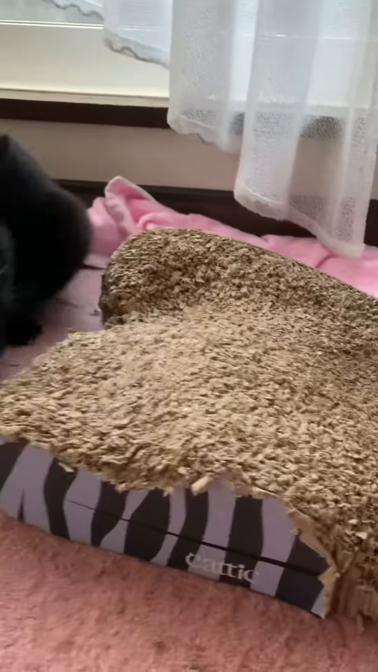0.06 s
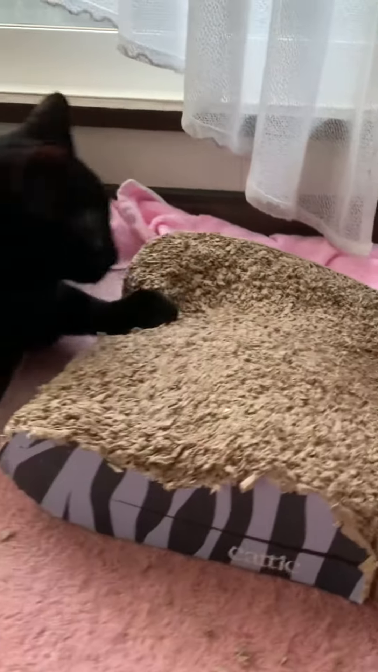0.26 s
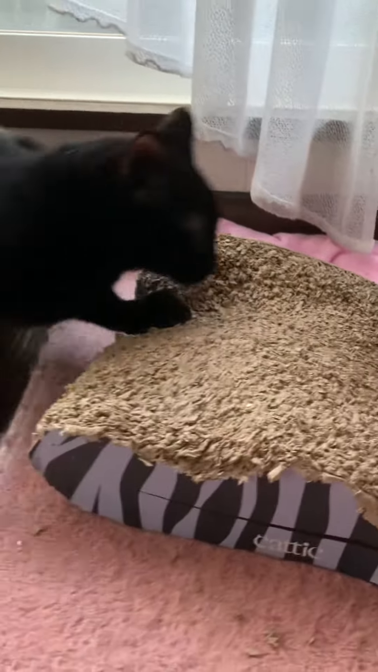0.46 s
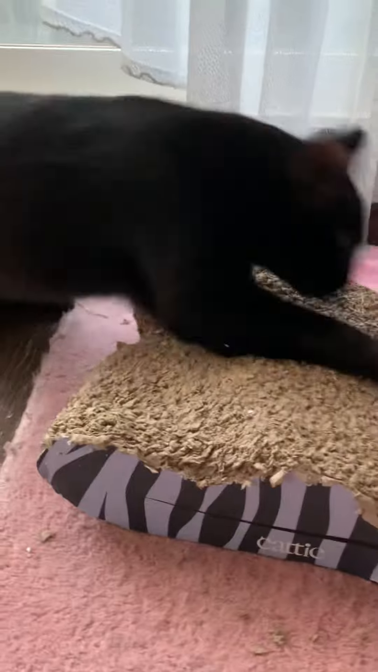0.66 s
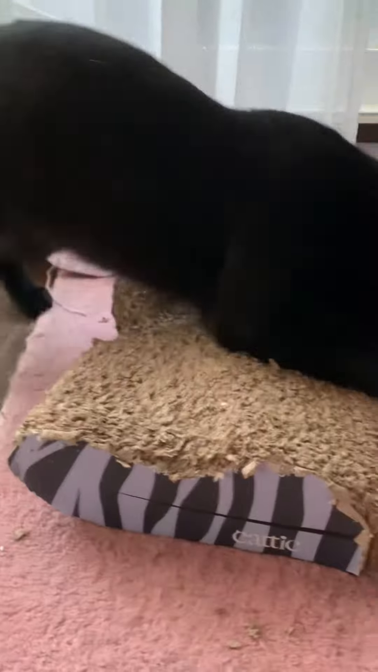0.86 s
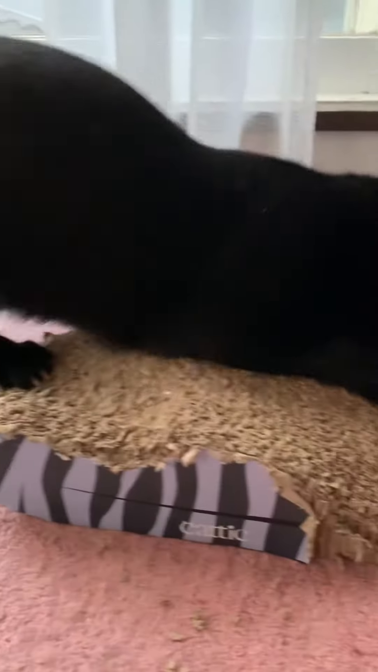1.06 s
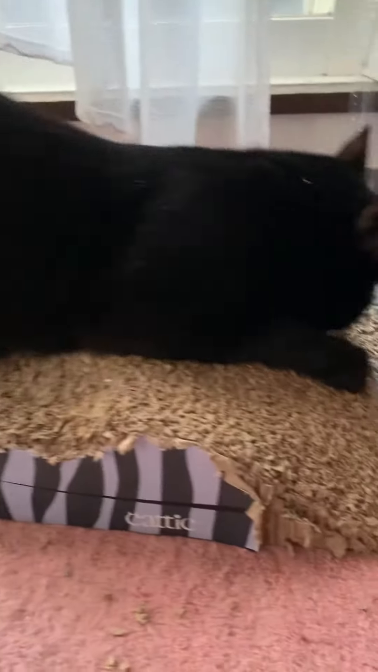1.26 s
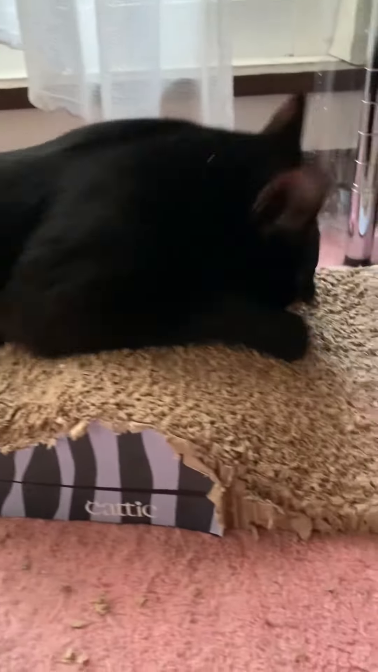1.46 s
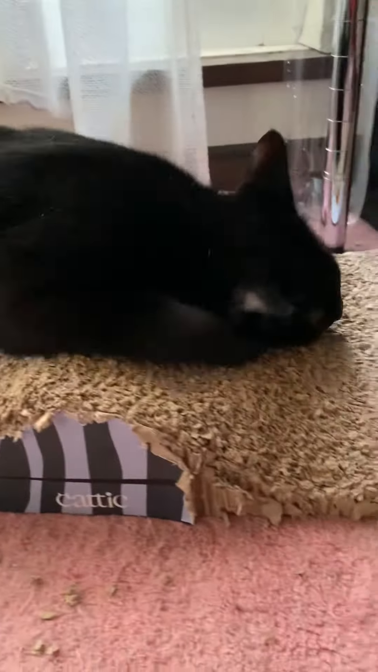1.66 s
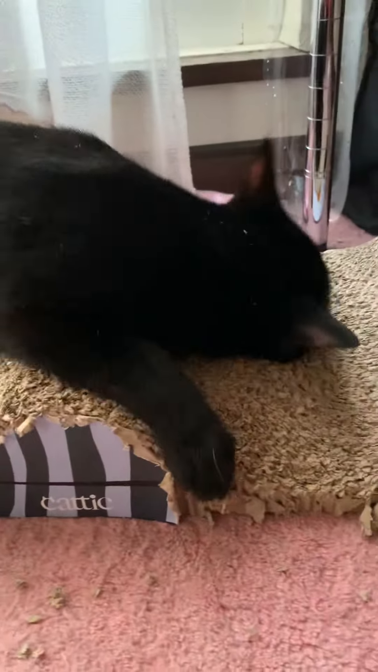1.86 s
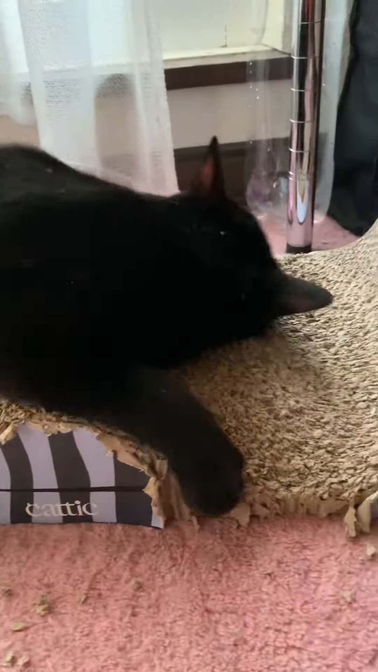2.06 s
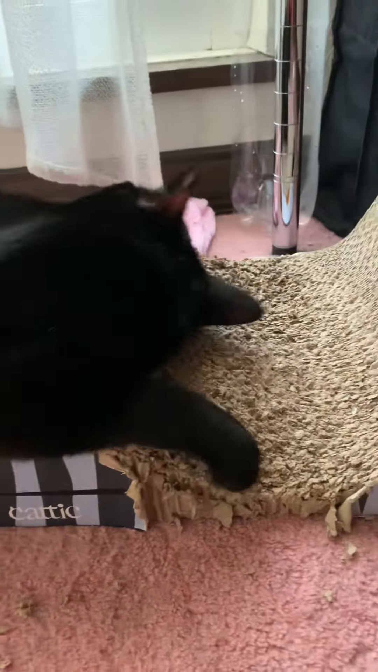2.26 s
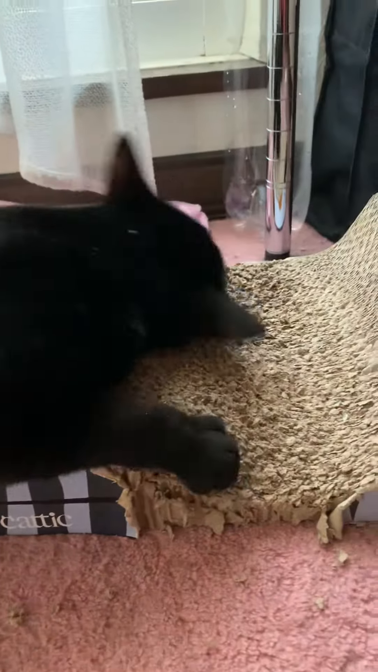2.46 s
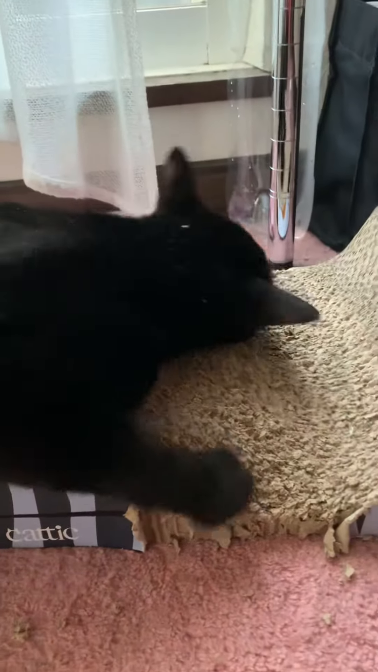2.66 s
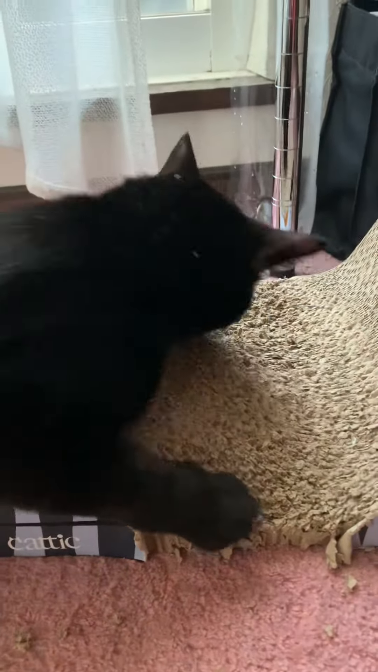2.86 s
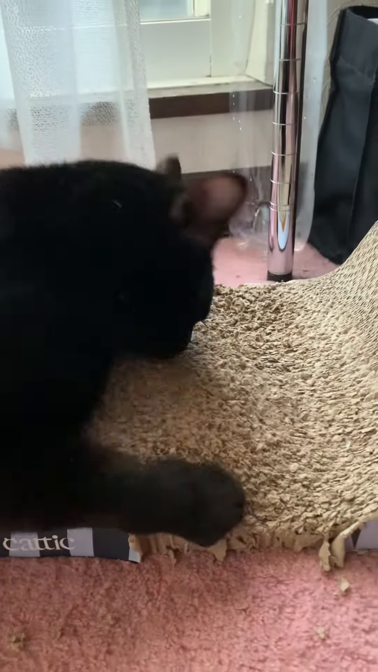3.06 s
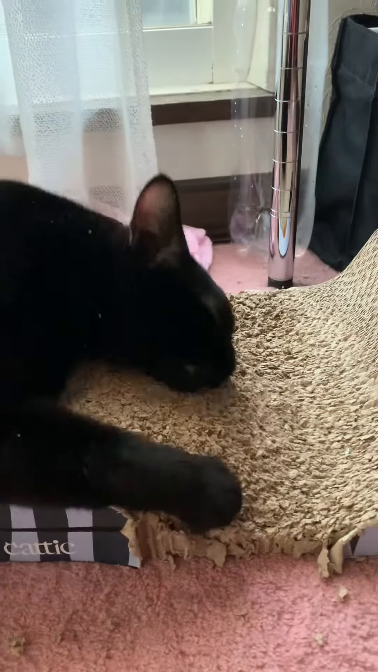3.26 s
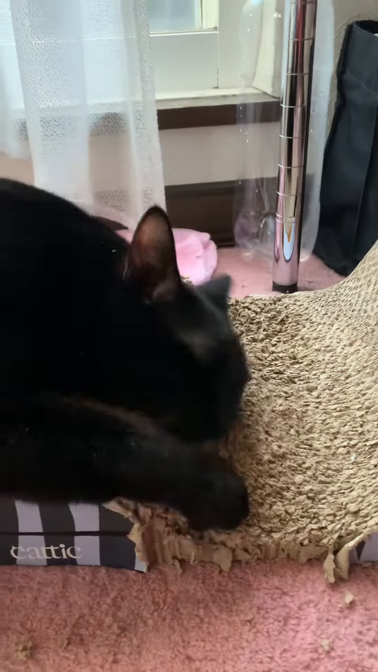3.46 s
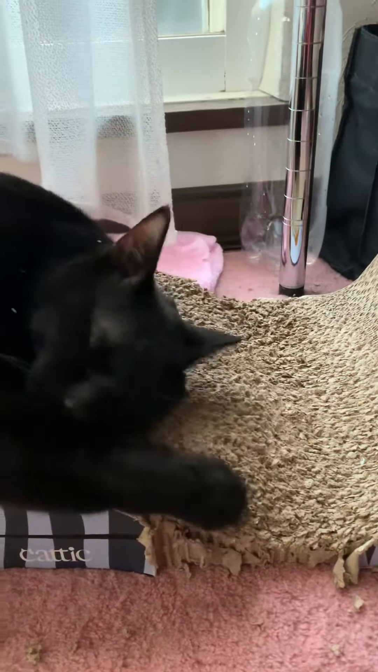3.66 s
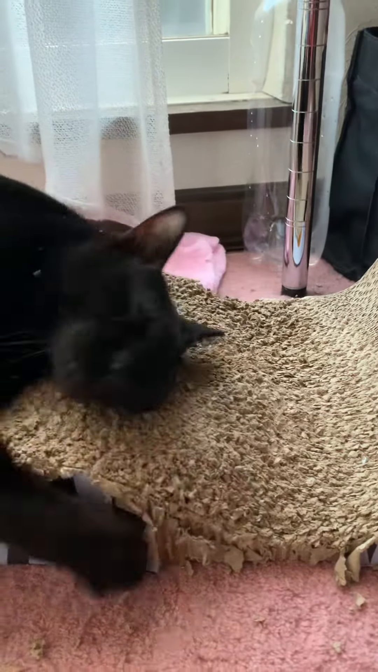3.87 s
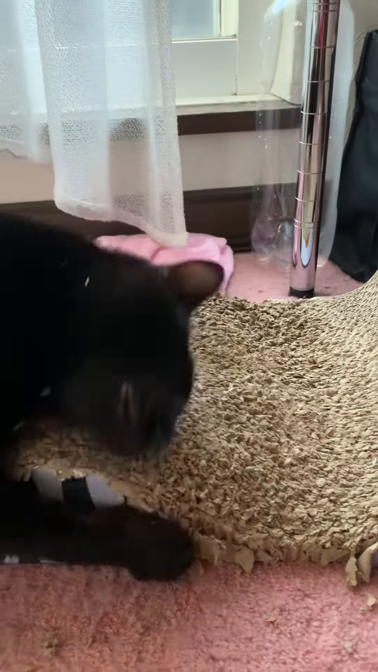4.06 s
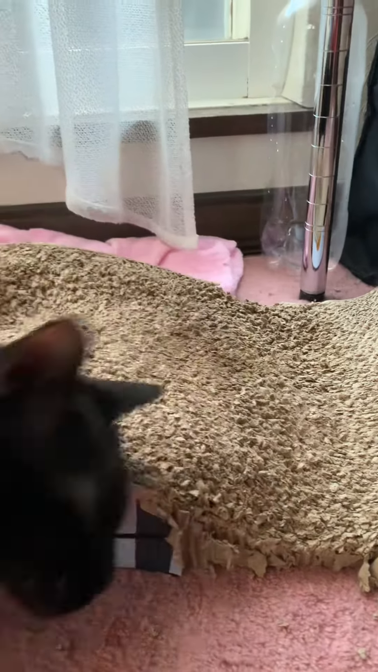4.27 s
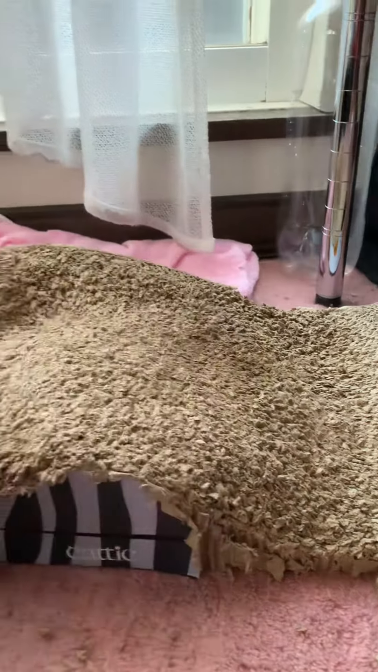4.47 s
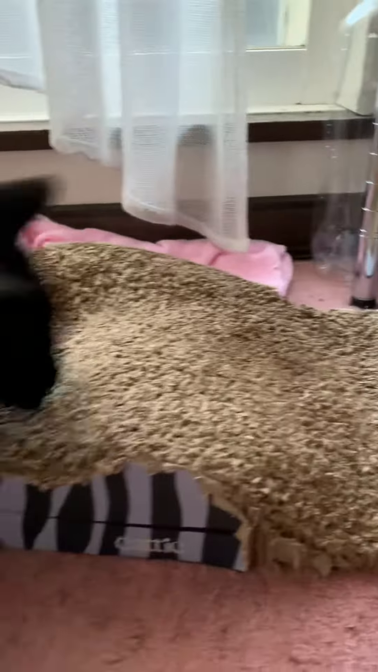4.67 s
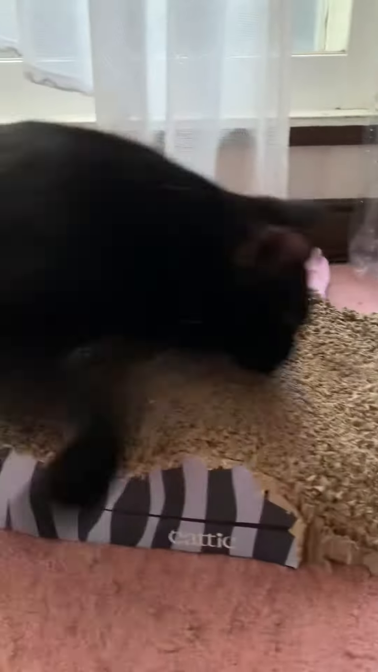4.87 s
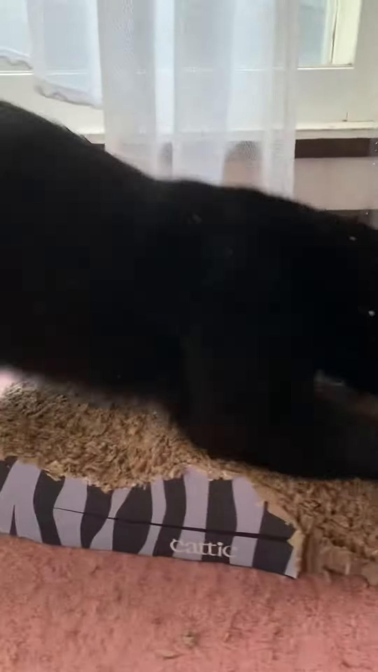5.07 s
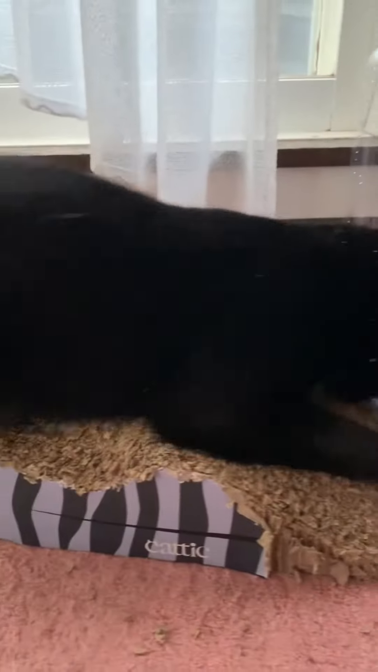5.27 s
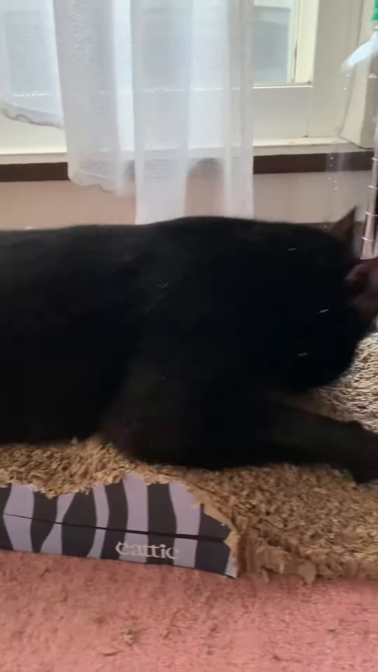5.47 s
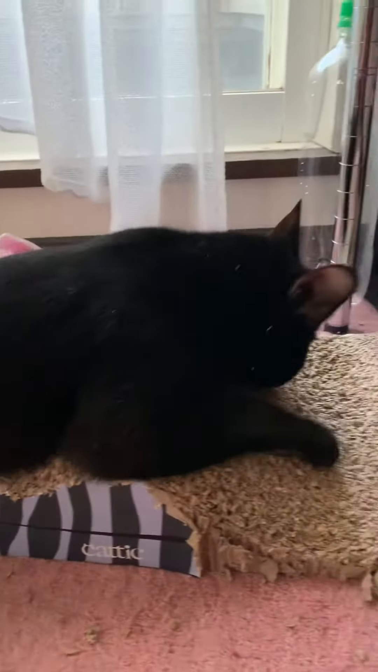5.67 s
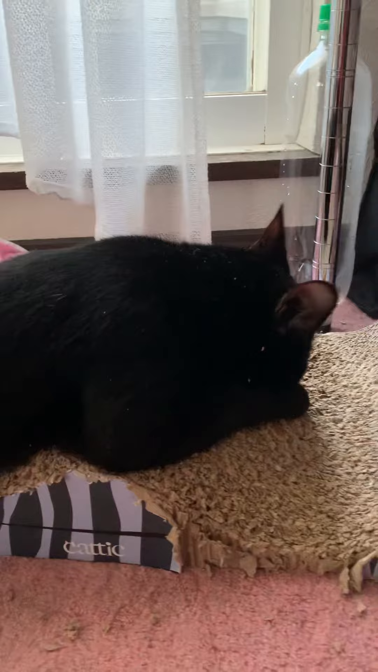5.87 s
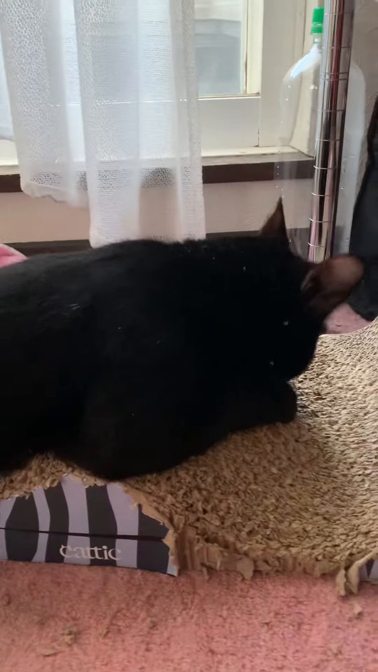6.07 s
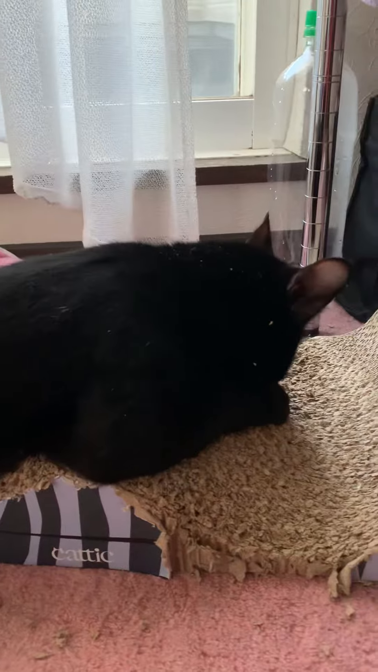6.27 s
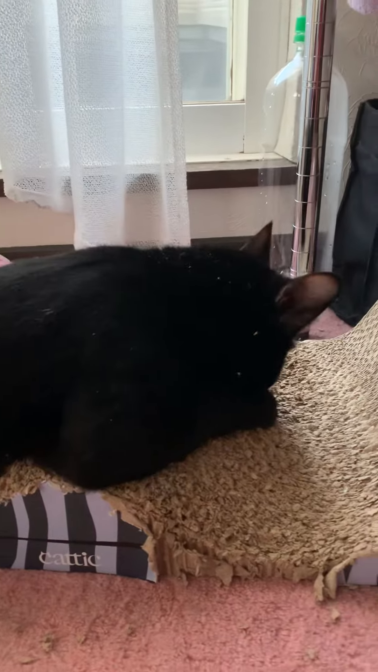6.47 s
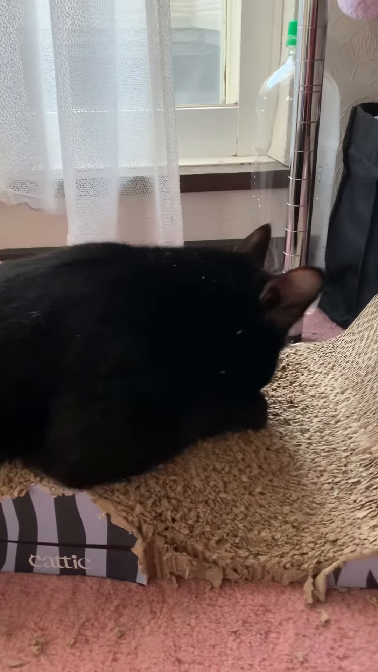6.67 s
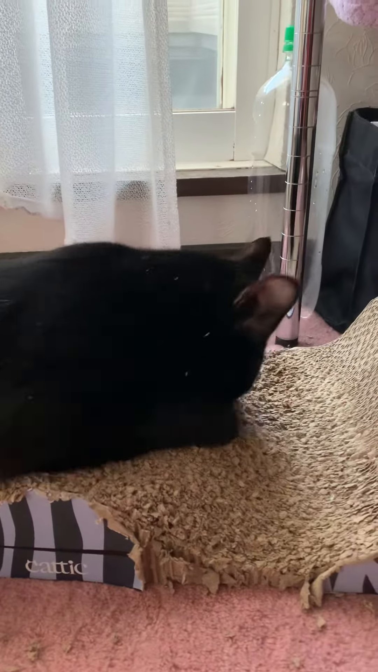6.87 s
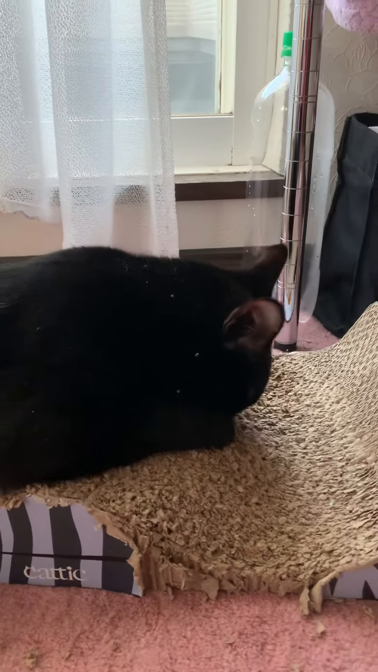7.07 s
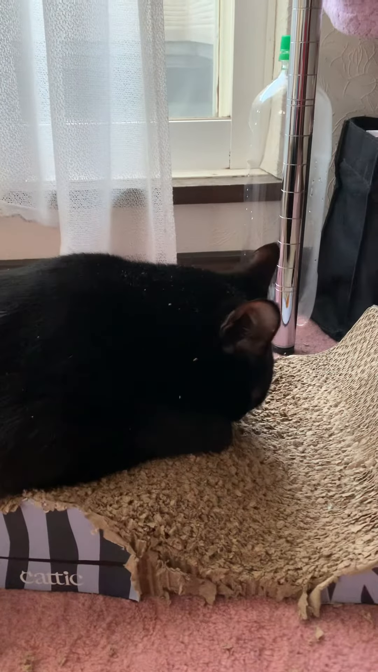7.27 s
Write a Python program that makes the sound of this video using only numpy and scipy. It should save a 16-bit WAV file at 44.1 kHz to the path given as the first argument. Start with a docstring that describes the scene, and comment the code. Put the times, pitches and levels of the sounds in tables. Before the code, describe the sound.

Very close in a quiet room, a cat climbs onto a shredded cardboard scratcher. Paws scuff and thump softly, the corrugated board crunches and snaps, then fur and cheek brush across it in uneven hissing strokes. It steps off with low thuds, returns with a heavy boom and a burst of crackles, then settles with only faint ticks.

```python
"""Cat rubbing on a cardboard scratcher

A cat steps onto a frayed scratcher on a carpet and rubs head and flank over it, close to two microphone ports.
Fur hiss, crunching flutes, flexing board and floor rumble are shaped noise following motion, scuffs and strokes.
Snaps are clicks, noise bursts and board rings; booms and pops are swelling sines; rasps are narrow noise bands.
"""
import sys
import numpy as np
from scipy import signal
from scipy.fft import rfft, irfft, next_fast_len
from scipy.io import wavfile
from scipy.ndimage import uniform_filter1d

SR = 44100
rng = np.random.default_rng(int(sys.argv[2]) if len(sys.argv) > 2 else 0)


def inscribe(sig):
    """Save sig as 16-bit PCM at rate SR to the path in sys.argv[1].

    A 1-D sig is mono; a 2-D sig holds one channel per row.
    Samples are clipped to [-1, 1] before scaling.
    """
    pcm = np.round(np.clip(np.atleast_2d(sig).T, -1, 1) * 32767)
    wavfile.write(sys.argv[1], SR, pcm.astype(np.int16))


N = 322812

# Quiet-room noise spectrum. Each row: frequency in Hz, relative level in dB per Hz.
AIR_SPECTRUM = [(15, -11), (25, 2), (74, 12.5), (189, -44), (248, -3), (371, -8.5), (414, -18), (5670, -31),
                (13400, -27.5), (15800, -34)]
# Cat's slow motion. Each row: time in seconds, fur sliding in dB, weight on the board in dB,
# weight shifting on the floor in dB.
CAT_MOTION = [(0.0, -75, -70.5, -62.5), (0.57, -82, -75.5, -58.5), (0.86, -77, -71, -32),
              (1.1, -77, -71.5, -59), (1.34, -69.5, -50, -52.5), (1.55, -75.5, -72, -49.5),
              (2.04, -59.5, -60, -52.5), (2.45, -70.5, -64, -58.5), (2.73, -65.5, -55.5, -50.5),
              (3.0, -72, -75.5, -56.5), (3.18, -69, -69, -55), (3.42, -67, -58.5, -52),
              (3.83, -66.5, -72.5, -56.5), (4.07, -74, -57.5, -40), (4.22, -67, -56, -40),
              (4.38, -74, -56.5, -32), (4.56, -83.5, -82.5, -53), (4.89, -79, -77, -49.5),
              (5.26, -71.5, -67.5, -51.5), (5.53, -71.5, -59, -30), (5.67, -76, -69, -55.5),
              (6.12, -88.5, -86.5, -66.5), (6.5, -89.5, -90, -68.5), (7.32, -87.5, -72.5, -63.5)]
# Short scuffs of paw or cheek. Each row: start in seconds, sliding in dB, flutes crushed in dB,
# thud in the board in dB, fall time constant in seconds.
SCUFFS = [(0.173, -70, -63, -52.5, 0.025), (0.198, -64.5, -55.5, -67, 0.021),
          (0.267, -88, -62.5, -55, 0.02), (0.348, -76.5, -63.5, -63, 0.094),
          (0.458, -76.5, -55.5, -59, 0.041), (0.508, -85, -55.5, -59, 0.011), (0.634, -77, -60, -44, 0.02),
          (0.758, -62.5, -46.5, -46, 0.067), (0.805, -54, -42.5, -39.5, 0.017),
          (0.851, -87, -78, -47.5, 0.026), (0.9376, -64.5, -53, -59.5, 0.024),
          (1.2384, -61, -50.5, -69, 0.042), (1.291, -69, -68, -50, 0.11), (1.346, -54, -42, -42.5, 0.016),
          (1.385, -84, -53, -46.5, 0.056), (1.487, -66, -52, -52, 0.0071), (1.649, -68, -61, -55.5, 0.22),
          (1.8895, -72, -50, -41, 0.015), (1.929, -83, -53, -50, 0.047), (2.043, -59, -80, -52.5, 0.055),
          (2.106, -53, -45.5, -53, 0.0084), (2.235, -64, -49, -83, 0.1), (2.279, -59, -45, -47, 0.015),
          (2.535, -62, -48, -71, 0.026), (2.6874, -54, -47.5, -69, 0.022),
          (2.774, -51, -39.5, -34.5, 0.0057), (3.203, -59, -48, -54, 0.0088),
          (3.3354, -57, -50, -38.5, 0.009), (3.501, -60, -49.5, -48.5, 0.031),
          (3.6414, -72, -112, -42.5, 0.016), (3.89, -65, -53, -47, 0.092), (4.272, -80, -72, -37.5, 0.05),
          (4.334, -62, -67, -42.5, 0.062), (4.7573, -65.5, -55.5, -45, 0.034),
          (4.9662, -58, -50.5, -39, 0.055), (5.081, -54, -48, -47, .008),
          (5.088, -49.5, -48.5, -39.5, 0.023), (5.196, -59.5, -50.5, -60, 0.013),
          (5.318, -63.5, -52, -42.5, 0.053), (5.4535, -77, -51.5, -42.5, 0.078),
          (5.517, -51.5, -42, -41, 0.015), (5.545, -87.5, -81, -35, 0.025),
          (5.613, -59.5, -46.5, -50, 0.028), (5.6725, -68.5, -53.5, -47.5, 0.021),
          (5.892, -62.5, -49.5, -48, 0.033), (6.596, -79.5, -69, -75, 0.066),
          (6.644, -73.5, -71, -70, 0.018), (6.763, -71, -60, -61, 0.09), (6.831, -65.5, -53, -74, 0.026),
          (6.907, -86, -58, -56.5, 0.026), (7.071, -88, -63.5, -65, 0.019), (7.121, -93, -62, -67, 0.054),
          (7.199, -89, -63, -77, 0.056), (7.252, -92, -52.5, -60, 0.012)]
# Long strokes of head or flank. Each row: start in seconds, length in seconds, sliding in dB,
# hair tips over the sliding in dB.
STROKES = [(0.0, 0.082, -67, -32), (1.305, 0.079, -54, -5), (1.584, 0.35, -63, -3.5),
           (1.985, 0.44, -68.5, 12), (2.465, 0.24, -65.5, 6.5), (3.412, 0.38, -61, -0.5),
           (3.878, 0.32, -57.5, -2.5), (4.229, 0.14, -61.5, 4), (4.531, 0.11, -65, 2.5),
           (5.354, 0.2, -57.5, 1.5), (5.608, 0.26, -73, -2)]
# Fur hiss spectrum. Each row: frequency in Hz, relative level in dB.
FUR_SPECTRUM = [(900, 0), (2000, -1.5), (3000, 2), (4000, 1.5), (5500, -8.5), (8000, -8), (11000, -13.5),
                (14000, -16), (14900, -41), (16000, -28)]
# Buckling flute spectrum. Each row: frequency in Hz, relative level in dB.
FLUTE_SPECTRUM = [(250, 3.5), (500, 4.5), (750, 7), (1000, 1.5), (1200, -2.5), (1600, -1.5), (2200, -9),
                  (3200, -23.5), (9000, -29.5)]
# Flexing hollow board spectrum. Each row: frequency in Hz, relative level in dB.
HOLLOW_SPECTRUM = [(70, -31.5), (130, 5), (180, 1), (260, -2.5), (360, -9.5), (500, -8.5), (800, -53),
                   (2000, -72)]
# Shaken floor panel spectrum. Each row: frequency in Hz, relative level in dB.
FLOOR_SPECTRUM = [(22, -23), (35, -2), (50, 5.5), (68, 4), (85, 3), (120, -9.5), (200, -13.5), (400, -66.5)]
# Claws and shreds letting go. Each row: start in seconds, nominal level in dB, pitch in Hz,
# nominal board knock level in dB.
SNAPS = [(0.1546, -43.5, 2170, -75), (0.304, -48, 5500, -80), (0.528, -46.5, 4100, -71),
         (0.5521, -56, 4050, -78), (0.6364, -47, 2300, -43), (0.665, -40, 2380, -74),
         (0.766, -59, 1800, -35), (0.79, -36.5, 2250, -33), (0.823, -33, 4000, -60),
         (1.104, -42.5, 1240, -90), (1.1278, -39.5, 3930, -68), (1.239, -33, 1300, -67),
         (1.2559, -43, 2620, -39.5), (1.3863, -22, 1580, -48), (1.4275, -39, 2080, -48),
         (1.475, -38, 3740, -42), (2.155, -32, 4230, -80), (2.156, -34.5, 1660, -64),
         (2.238, -44, 1380, -48), (2.3048, -38, 7100, -40), (2.386, -32, 1830, -41.5),
         (2.404, -43.5, 7050, -65), (2.5357, -34.5, 8300, -41.5), (2.5586, -34.5, 7960, -50),
         (2.646, -42, 4300, -62), (2.666, -31.5, 1950, -51), (2.689, -33, 2390, -60),
         (2.708, -30, 2320, -52), (2.735, -42, 2300, -60), (2.772, -41.5, 8850, -25.5),
         (2.782, -30, 4700, -43), (2.83, -34.5, 2310, -41.5), (2.832, -37, 4180, -63),
         (3.2045, -32.5, 3630, -38), (3.213, -42, 4530, -55), (3.279, -41, 5570, -38.5),
         (3.289, -44, 5500, -57), (3.315, -38, 7250, -37.5), (3.34, -32.5, 6000, -35),
         (3.406, -38, 2320, -40.5), (3.7245, -42, 8900, -59), (4.729, -42.5, 5770, -51),
         (4.762, -49, 900, -34), (4.8903, -44.5, 6250, -86), (4.9594, -43, 4200, -48),
         (4.97, -39, 7100, -30.5), (5.0662, -38, 3440, -28.5), (5.069, -40.5, 9500, -60),
         (5.094, -34, 3700, -39.5), (5.1551, -33, 4580, -43), (5.219, -36, 1670, -46),
         (5.3152, -22.5, 1820, -46), (5.401, -30.5, 1560, -41), (5.441, -35, 4000, -35.5),
         (5.4554, -25, 1520, -34), (5.4832, -29.5, 4530, -25.5), (5.618, -40.5, 7200, -39.5),
         (5.886, -44, 1370, -56), (5.9425, -53, 3570, -47.5), (6.764, -51, 2810, -67),
         (6.847, -55, 3180, -70), (7.022, -66, 1700, -81), (7.075, -51, 1684, -80), (7.256, -59, 3200, -79)]
# Board modes. Each row: pitch in Hz before detuning, relative level in dB before scatter, 60 dB decay in seconds.
BOARD_MODES = [(175, 9, .1), (265, 8, .07), (360, 4, .05), (490, 4, .04), (640, 3, .03), (820, 4, .024),
               (1250, -3, .016)]
# Paws and body landing. Each row: nominal time in seconds, nominal level in dB, nominal floor pitch in Hz.
THUMPS = [(0.187, -46, 57.6), (0.661, -23, 60.3), (0.837, -37, 138.7), (0.962, -28, 71.9),
          (1.293, -23, 71.4), (1.323, -31, 78.7), (1.385, -32, 76.5), (1.655, -36, 71), (1.838, -48, 113),
          (2.03, -40.5, 83), (2.393, -45, 60.3), (2.791, -41.5, 121), (3.223, -50.5, 99),
          (3.35, -40.5, 113.3), (3.467, -42, 63), (3.896, -34.5, 72), (4.04, -32.5, 74.1),
          (4.068, -28.5, 64.6), (4.131, -24.5, 62.3), (4.284, -22.5, 110), (4.454, -24, 70.4),
          (4.772, -29.5, 62), (4.993, -15.5, 65.55), (5.08, -25, 82.4), (5.329, -21, 72.2),
          (5.548, -21.5, 64.7), (5.837, -48.5, 58.4), (6.855, -48.5, 99.7)]
# Paw, claw or cheek popping a board cell. Each row: start in seconds, nominal peak in dB,
# pitch at the peak in Hz, swell in seconds (held within 1-20 ms).
POPS = [(.176, -55.5, 2280, 0.0019), (.179, -47.5, 400, 0.0027), (0.461, -50, 930, 0.0026),
        (0.639, -43.5, 745, 0.0028), (.645, -37.5, 211, .006), (.766, -40, 740, 0.0026),
        (0.808, -36, 810, 0.0023), (.824, -39.5, 784, 0.0054), (.837, -35, 650, 0.0014),
        (0.844, -35.5, 270, 0.005), (1.2535, -38.5, 1035, 0.0021), (1.898, -36, 376, 0.0022),
        (1.931, -39, 490, 0.0045), (2.24, -42, 480, .003), (2.276, -38.5, 248, 0.0022),
        (2.293, -31.5, 780, 0.0022), (2.3021, -34.5, 700, 0.003), (2.308, -39.5, 308, 0.005),
        (2.539, -38.5, 780, 0.0017), (2.559, -41, 1080, 0.0011), (2.772, -31.5, 530, 0.0012),
        (2.771, -44, 1270, 0.0017), (2.781, -40.5, 393, 0.0048), (3.343, -43, 300, 0.0032),
        (3.502, -41.5, 325, 0.0073), (3.89, -38, 440, 0.0017), (4.272, -28, 250, 0.0084),
        (4.352, -35, 231, 0.0088), (4.368, -40.5, 388, 0.0045), (4.768, -42.5, 475, 0.004),
        (4.773, -37.5, 163.4, 0.016), (4.974, -33.5, 807, 0.0036), (4.982, -30, 208, 0.0044),
        (5.069, -37, 1630, 0.00091), (5.073, -38.5, 750, 0.005), (5.097, -35, 412, 0.007),
        (5.317, -43, 710, 0.0015), (5.32, -36, 245, 0.0062), (5.482, -41, 294, 0.0075),
        (5.538, -31, 193.5, 0.009), (5.617, -40.5, 710, 0.0025), (5.902, -48, 858, 0.006),
        (6.764, -47.5, 1436, 0.0016), (6.912, -58, 1450, .002), (7.076, -60, 740, 0.0025),
        (7.254, -47.5, 1390, 0.002), (7.255, -65, 720, 0.0023)]
# Drags that sing in one band. Each row: start in seconds, length in seconds, level in dB, pitch in Hz.
RASPS = [(2.675, 0.06, -51, 2100), (3.502, 0.086, -55, 7000), (4.022, 0.15, -51, 3640),
         (4.227, 0.13, -60, 3970), (5.355, 0.036, -55, 1960), (5.314, 0.078, -57, 1085),
         (5.506, 0.036, -44, 3900), (5.505, 0.038, -47.5, 1230), (0.24, 0.019, -68, 1700),
         (1.812, 0.08, -62.5, 3700), (0.814, 0.023, -54, 3980), (1.35, 0.025, -56, 3700),
         (1.344, 0.028, -48.5, 1440), (2.29, 0.025, -56, 3800), (6.897, 0.047, -66, 1300),
         (7.114, 0.028, -64.5, 1430), (7.116, 0.029, -65, 760), (7.185, .06, -66, 1400),
         (7.216, 0.045, -64.5, 990), (7.248, 0.028, -60.5, 1560), (3.884, 0.02, -49.5, 1570),
         (1.9, 0.017, -61.5, 1200), (5.092, 0.022, -50, 920)]
# Likeness of the diffuse sound at the ports. Each row: frequency in Hz, left-right likeness from 0 to 1.
PORT_LIKENESS = [(60, 0.98), (500, 0.66), (2000, 0.57), (2800, 0.12), (4000, 0.36), (6000, 0.11),
                 (8000, 0.96), (15000, 1)]
# Port balance. Each row: frequency in Hz, left over right in dB.
LEFT_OVER_RIGHT = [(60, -2.5), (1500, -1.15), (2800, 2.5), (4000, 1), (5800, -2.5), (7500, 0.3), (15000, 0)]

AIR_RMS_DB = -70.5
SCUFF_RISE_S = 0.0091
STROKE_IN_SHARE, STROKE_OUT_S = 0.39, 0.03  # share of the length spent swelling; lift-off time
FUR_PATCH_DB = 1.4  # rms depth of the colour patches
TIPS_GROWTH_DB_PER_DB = 0.31  # extra hair tips per dB of sliding above -65 dB
FLEX_DB = 2  # board flexing over the weight
CRACK_DB, CRACK_DB_PER_OCTAVE = -6.5, 10.5  # crack noise gain for a 4 kHz snap; growth with snap pitch
CLICK_S, CLICK_DB, CLICK_CYCLES = 0.0013, -7, 0.75  # click centre after snap start; level; Gaussian width
SWELL_S, SWELL_S_PER_DB = 0.024, -0.00015  # boom swell at -10.5 dB; shorter for a harder landing
POP_SAG = 0.1  # share by which a pop starts above its pitch
POP_ROUGH = 0.35  # amplitude noise in a pop
LAG_FROM_HZ, LAG_S = 7125, 0.000331  # above this pitch the left port hears later
EDGE_HZ = 15800


def gain_of(db):
    """Decibels to an amplitude factor."""
    return 10 ** (np.asarray(db) / 20)


def evened(x):
    """Scales to rms 1."""
    return x / np.sqrt(np.mean(x ** 2) + 1e-20)


def read(points, hz):
    """Interpolates a (Hz, value) table on a log-frequency axis."""
    f, value = np.transpose(points)
    return np.interp(np.log(hz + 1), np.log(f + 1), value)


def along(table, column):
    """Interpolates one table column over time, sample by sample."""
    rows = np.array(table)
    return np.interp(np.arange(N) / SR, rows[:, 0], rows[:, column])


def add(mix, start_s, sound):
    """Adds a sound to the mix at its start, cut at the end of the mix."""
    part = mix[..., round(start_s * SR):][..., :sound.shape[-1]]
    part += sound[..., :part.shape[-1]]


def bandpass(low_hz, high_hz):
    """Second-order Butterworth band filter."""
    return signal.butter(2, [low_hz, high_hz], "bandpass", fs=SR, output="sos")


def coloured(x, points):
    """Filters by a spectrum table."""
    size = next_fast_len(N)
    gain = gain_of(read(points, np.fft.rfftfreq(size, 1 / SR)))
    return irfft(rfft(x, size) * gain, size)[..., :N]


def wander(seconds):
    """Slow random drift of rms 1: noise averaged twice."""
    size = round(seconds * SR)
    once = uniform_filter1d(rng.standard_normal(N), size)
    return evened(uniform_filter1d(once, size))


def patchy(x, patch_db, wide_hz, long_s):
    """Each spot of the worn surface has its own colour: random patches over pitch and time."""
    z = signal.stft(x, nperseg=1024)[2]
    noise = rng.standard_normal(z.shape[:0:-1]).T
    field = uniform_filter1d(noise, max(round(wide_hz * 1024 / SR), 1), axis=0)
    field = evened(uniform_filter1d(field, max(round(long_s * SR / 512), 1), axis=1))
    return signal.istft(z * gain_of(patch_db * field), nperseg=1024)[1][:, :N]


def rubbing(per_s, spread_db, grain_s, smooth, clump_db):
    """Tiny uneven slips in clumps over a smooth hiss; two unrelated noise draws share one envelope."""
    sizes = gain_of(spread_db * np.minimum(rng.exponential(1, N), 4.1))
    slips = sizes * (rng.random(N) < per_s / SR)
    power = signal.lfilter([1], [1, -np.exp(-2 / (grain_s * SR))], slips ** 2)
    grains = np.sqrt(abs(power))
    envelope = (smooth + evened(grains)) * gain_of(clump_db * wander(0.034))
    return envelope * rng.standard_normal((2, N))


def pressure(motion_column, scuff_column):
    """Level of one rubbing layer: slow motion and scuffs add in power."""
    power = gain_of(2 * along(CAT_MOTION, motion_column))
    t = np.arange(9000) / SR
    for row in SCUFFS:
        rise = np.minimum(t / SCUFF_RISE_S, 1) ** 0.6
        fall = np.exp(-np.maximum(t - SCUFF_RISE_S, 0) / max(row[-1], 0.001))
        add(power, row[0], (gain_of(row[scuff_column]) * rise * fall) ** 2)
    return np.sqrt(power)


def air():
    """Quiet room: steady coloured noise, unrelated in two draws."""
    return gain_of(AIR_RMS_DB) * evened(coloured(rng.standard_normal((2, N)), AIR_SPECTRUM))


def strokes():
    """Power of the long strokes, for hiss body and hair tips: swell, hold, quick lift."""
    out = np.zeros((2, N))
    for start_s, length_s, db, tips_db in STROKES:
        t = np.arange(0, length_s, 1 / SR)
        swell = t / (STROKE_IN_SHARE * length_s)
        lift = (length_s - t) / STROKE_OUT_S
        shape = np.clip(np.minimum(swell, lift), 0, 1)
        add(out, start_s, (gain_of([[db], [db + tips_db]]) * shape) ** 2)
    return out


def fur():
    """Fur and whiskers brushing the shreds; hair tips give the treble."""
    slips = coloured(rubbing(400, 11.0, 0.0019, 3.7, 0.1), FUR_SPECTRUM)
    hiss = evened(patchy(slips, FUR_PATCH_DB, 900, 0.16))
    low = signal.sosfiltfilt(signal.butter(3, 5800, fs=SR, output="sos"), hiss)
    slide = pressure(1, 1)
    brighter = (slide / gain_of(-65)) ** TIPS_GROWTH_DB_PER_DB
    body, tips = np.sqrt(np.array([slide, brighter * slide]) ** 2 + strokes())
    return body * evened(low) + tips * evened(hiss - low)


def crunch():
    """Paper flutes buckling under the weight: coarser, duller slips."""
    slips = coloured(rubbing(420, 4.4, 0.004, 0.94, 1.8), FLUTE_SPECTRUM)
    return pressure(2, 2) * evened(patchy(slips, 2.6, 260, 0.07))


def hollow():
    """The whole board flexing and thudding on the carpet: sparse, long, low slips."""
    thuds = coloured(rubbing(66, 0.26, 0.013, 0.98, 0.61), HOLLOW_SPECTRUM)
    return gain_of(FLEX_DB) * pressure(2, 3) * evened(patchy(thuds, 3.0, 90, 0.07))


def rumble():
    """The floor panel shaken by shifting weight: lumpy low noise."""
    lumps = gain_of(5.0 * wander(0.045))
    shaking = coloured(lumps * rng.standard_normal((2, N)), FLOOR_SPECTRUM)
    return gain_of(along(CAT_MOTION, 3)) * evened(shaking)


def snaps():
    """Each snap is a sharp click, a ring at its pitch, a treble crack and a knock in the hollow board."""
    ticks, knocks, t = np.zeros((2, N)), np.zeros(N), np.arange(3000) / SR
    noises = rng.standard_normal((len(SNAPS), 2, len(t)))
    scatters = rng.uniform(-1.6, 1, (len(SNAPS), len(BOARD_MODES), 2))
    treble = bandpass(2800, 14500)
    fade = np.exp(-t / 0.0013) + 0.079 * np.exp(-t / 0.019)  # the shreds settle after the snap
    for (start_s, db, hz, knock_db), noise, scatter in zip(SNAPS, noises, scatters):
        ring = gain_of(db - 6.5) * evened(signal.sosfilt(bandpass(hz / 1.19, hz * 1.216), noise))
        crack_db = db + CRACK_DB + CRACK_DB_PER_OCTAVE * np.log2(hz / 4000)
        crack = gain_of(crack_db) * signal.sosfilt(treble, noise)
        add(ticks, start_s, (ring + crack) * fade * np.minimum(t / 0.001, 1))
        cycles = hz * (t - CLICK_S)
        click = np.cos(2 * np.pi * cycles) * np.exp(-(cycles / CLICK_CYCLES) ** 2)
        add(ticks, start_s, gain_of(db + CLICK_DB) * np.ones((2, 1)) * click)
        for (mode_hz, mode_db, t60_s), (detune, boost) in zip(BOARD_MODES, scatter):
            decay = gain_of(mode_db + 7.8 * boost - 60 * t / t60_s)
            mode = decay * np.sin(2 * np.pi * mode_hz * (1 + 0.05 * detune) * t)
            late_s = 0.01187 * (np.sqrt(400 / mode_hz) - 0.55)  # long bending waves travel slower
            onset = np.minimum(t * mode_hz / 3.95, 1)
            add(knocks, start_s + late_s, gain_of(knock_db - 10.0) * mode * onset)
    return ticks, knocks


def thumps():
    """Bending waves in the floor: short ones arrive first, so each boom falls in pitch, swells and dies."""
    out, t = np.zeros(N), np.arange(SR // 2) / SR
    for time_s, db, hz in THUMPS:
        turns = np.cumsum(hz * (0.9 + 1.223 * np.exp(-t / 0.01296))) / SR
        u = t / (SWELL_S + SWELL_S_PER_DB * (db + 10.5))
        hump = (u * np.exp((1 - u ** 2) / 2)) ** 2.34
        tail = 0.42 * (1 - np.exp(-u ** 4)) * np.exp(-t / 0.08)
        add(out, time_s - 0.012, gain_of(db) * (hump + tail) * np.sin(2 * np.pi * turns))
    return out


def pops():
    """Each pop is a few ragged cycles that swell, sink a little in pitch and die."""
    out = np.zeros(N)
    phases = rng.random((len(POPS), 1))
    noises = rng.standard_normal((len(POPS), 8000))
    for (start_s, db, hz, swell_s), (phase,), noise in zip(POPS, phases, noises):
        u = np.arange(0, 7, 1 / (np.clip(swell_s, 0.001, 0.02) * SR))  # time in swells
        sag = 1 + POP_SAG * (1 - u) * np.exp(-u / 3)
        turns = phase + np.cumsum(hz * sag) / SR
        ragged = 1 + POP_ROUGH * evened(uniform_filter1d(noise, round(SR / hz)))[:len(u)]
        envelope = (u * np.exp(1 - u)) ** 2.3
        add(out, start_s, gain_of(db) * envelope * ragged * np.sin(2 * np.pi * turns))
    return out


def rasps():
    """A claw or whisker dragged over a row of equal flutes: fine slips in a narrow band."""
    slips, out = rubbing(900, 0.67, 0.001, 1.0, 0.48), np.zeros((2, N))
    for start_s, length_s, db, hz in RASPS:
        drag = slips[:, round(start_s * SR):round((start_s + length_s) * SR)]
        part = signal.sosfilt(bandpass(hz / 1.27, hz * 1.2), drag)
        add(out, start_s, gain_of(db) * evened(part) * signal.windows.tukey(part.shape[1], 0.6))
    return out


def ports(near, spread):
    """Two ports share the near sound; the right blends the left's spread sound with its own, treble earlier."""
    size = next_fast_len(N)
    hz = np.fft.rfftfreq(size, 1 / SR)
    same = np.clip(read(PORT_LIKENESS, hz), 0, 1)
    lead = np.exp(2j * np.pi * LAG_S * np.maximum(hz - LAG_FROM_HZ, 0))
    tilt = gain_of(read(LEFT_OVER_RIGHT, hz) / 2)
    a, b, both = rfft(spread[0], size), rfft(spread[1], size), rfft(near, size)
    left = a + both
    right = lead * (same * a + np.sqrt(1 - same ** 2) * b) + both
    return irfft(np.array([left * tilt, right / tilt]), size)[:, :N]


def scene():
    """All sources in the quiet room, heard at the two ports."""
    ticks, knocks = snaps()
    spread = air() + fur() + crunch() + hollow() + rumble() + ticks + rasps()
    near = knocks + thumps() + pops()
    return ports(near, spread)


def record(dry):
    """Small microphones lose the deepest bass; then the band limit."""
    thin = signal.sosfilt(signal.butter(2, 36, "highpass", fs=SR, output="sos"), dry)
    band_limit = signal.firwin(511, EDGE_HZ, window=("kaiser", 9), fs=SR)
    return signal.oaconvolve(thin, band_limit[None], "same")


dry = scene()
out = record(dry)
inscribe(out)
```